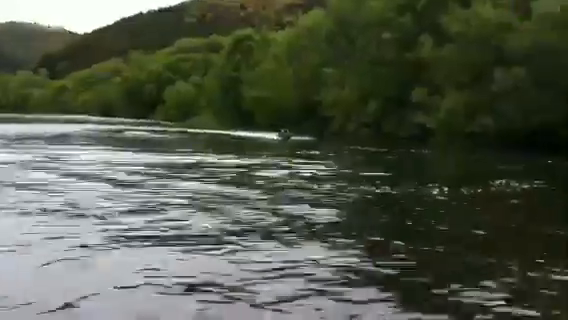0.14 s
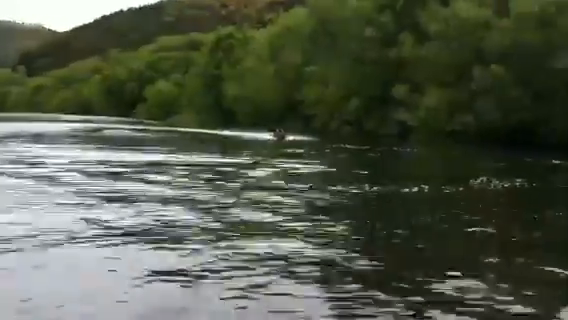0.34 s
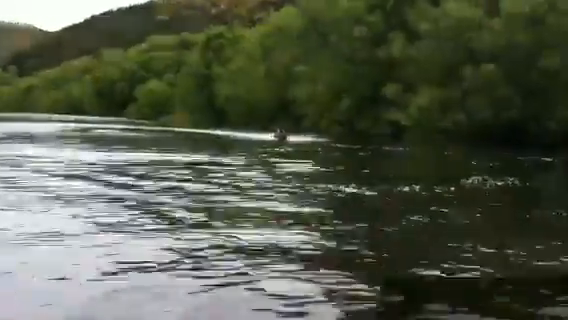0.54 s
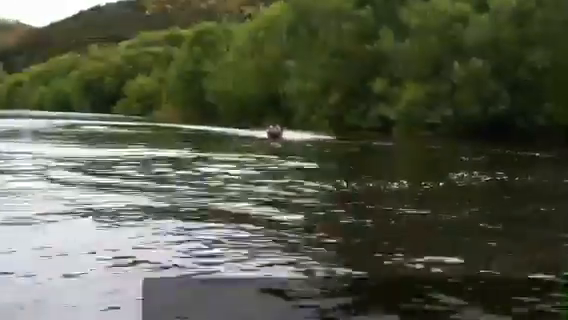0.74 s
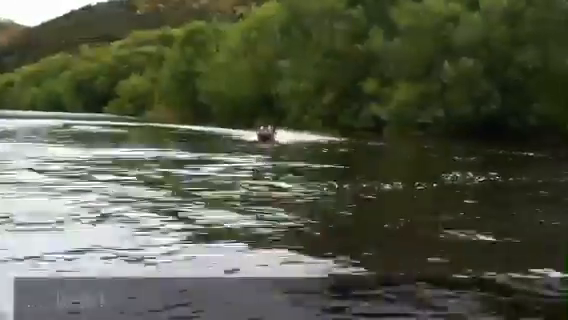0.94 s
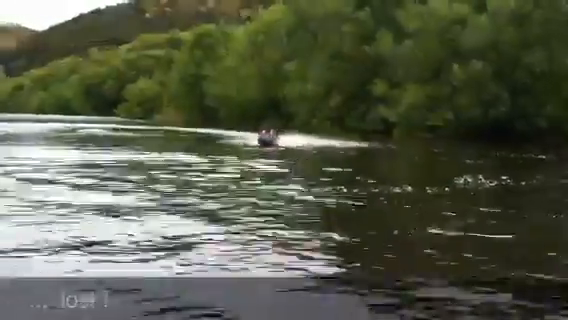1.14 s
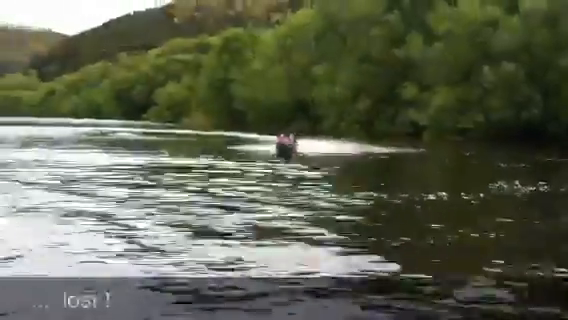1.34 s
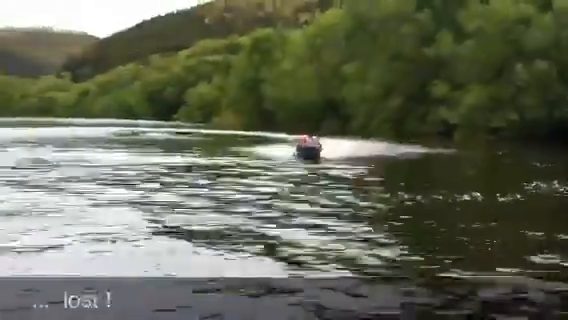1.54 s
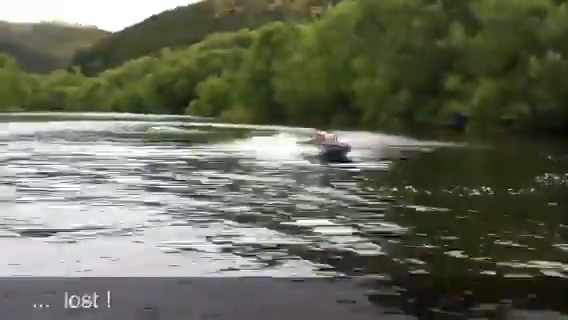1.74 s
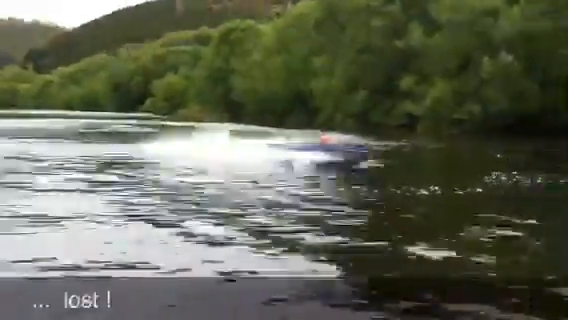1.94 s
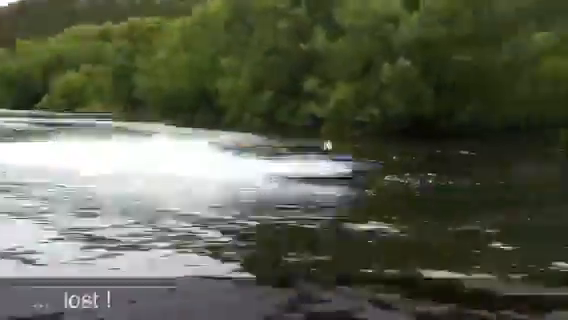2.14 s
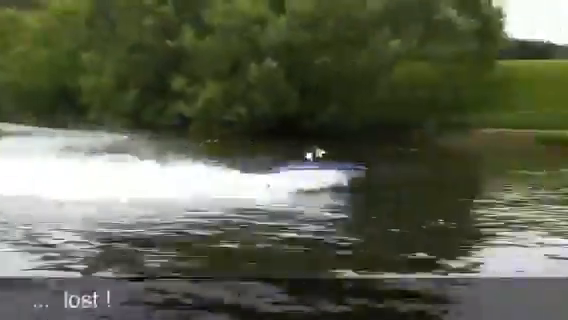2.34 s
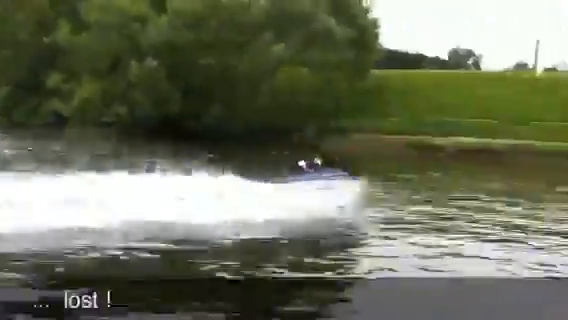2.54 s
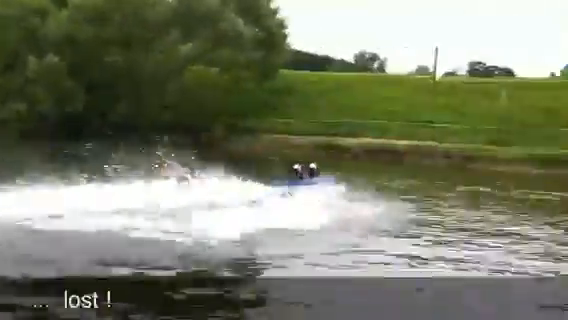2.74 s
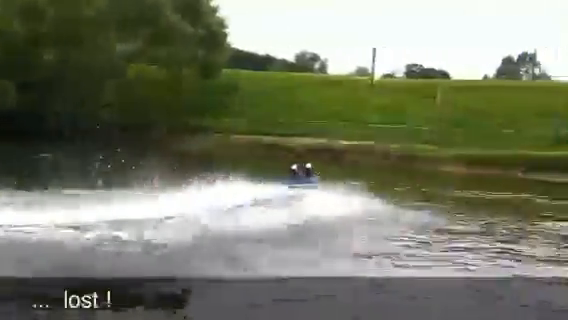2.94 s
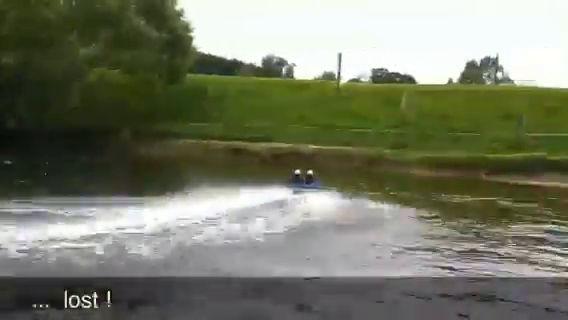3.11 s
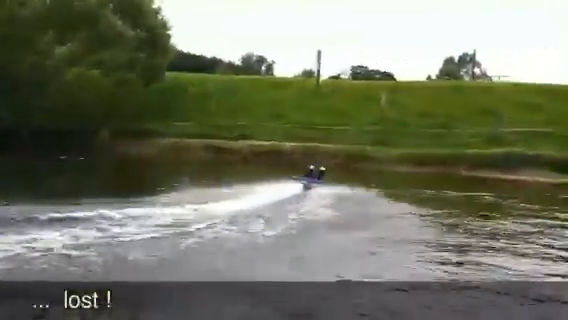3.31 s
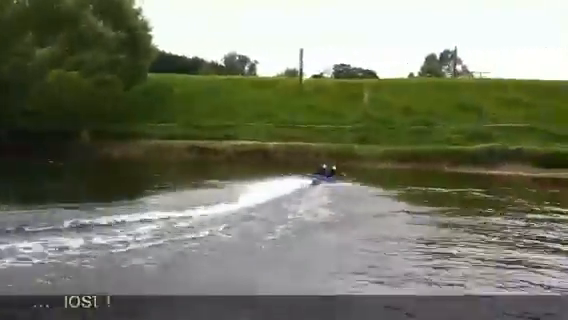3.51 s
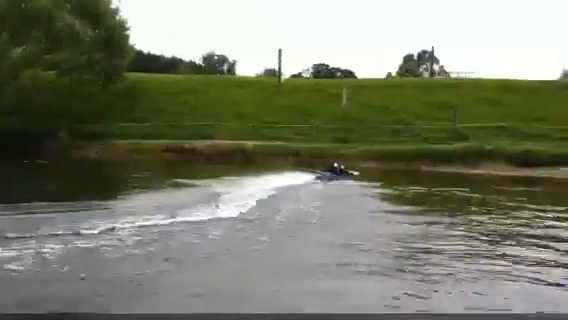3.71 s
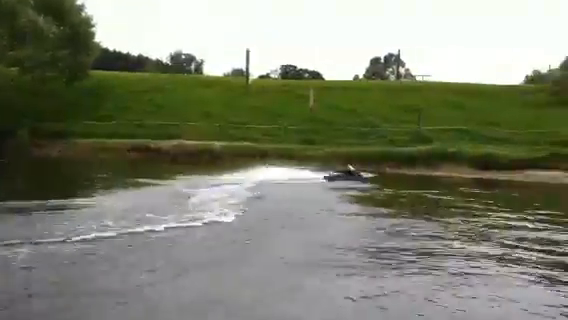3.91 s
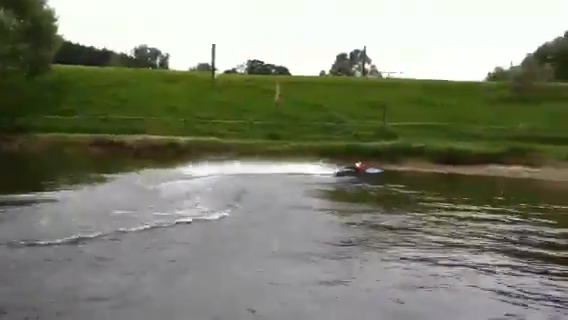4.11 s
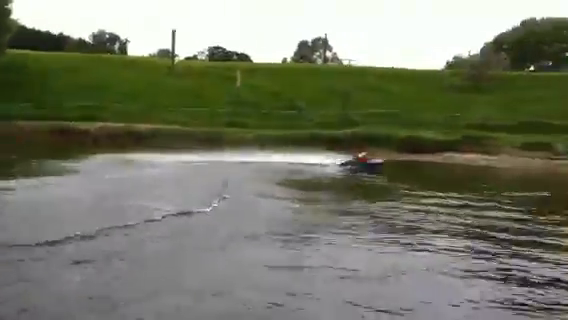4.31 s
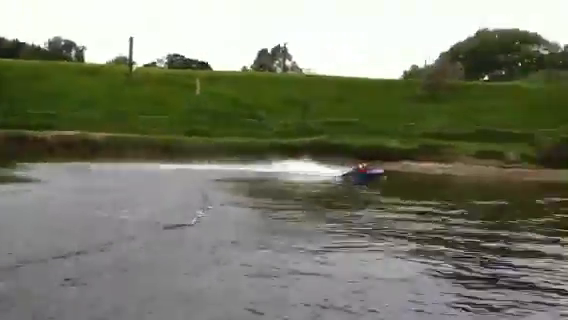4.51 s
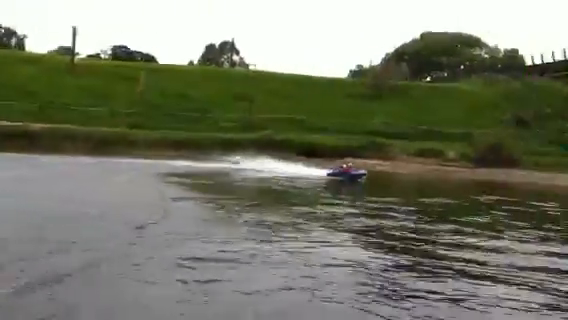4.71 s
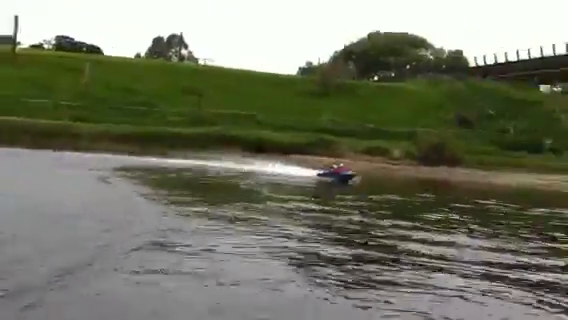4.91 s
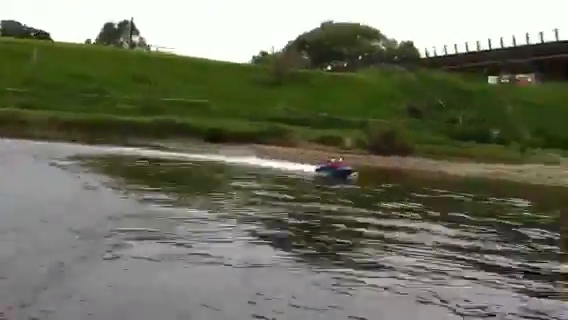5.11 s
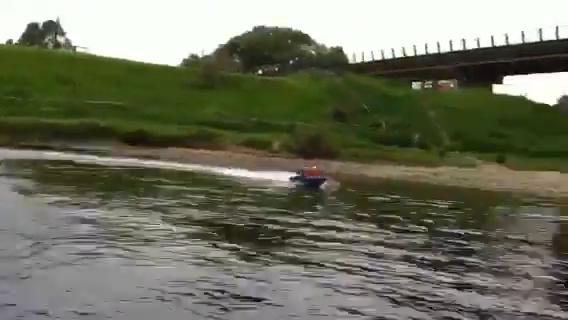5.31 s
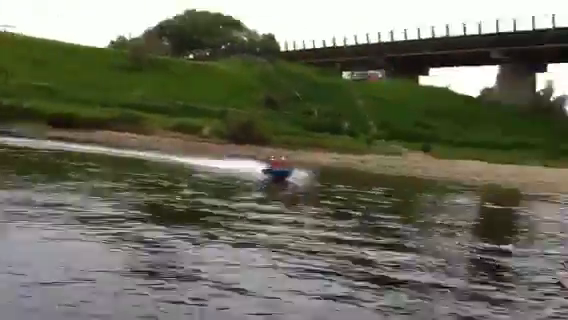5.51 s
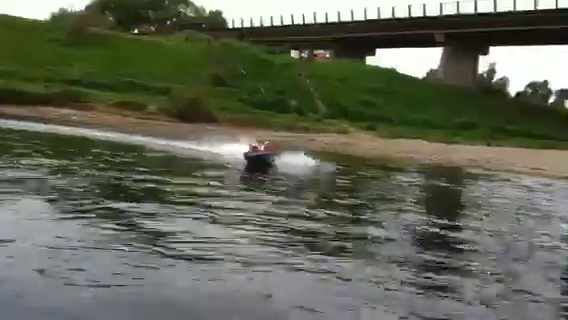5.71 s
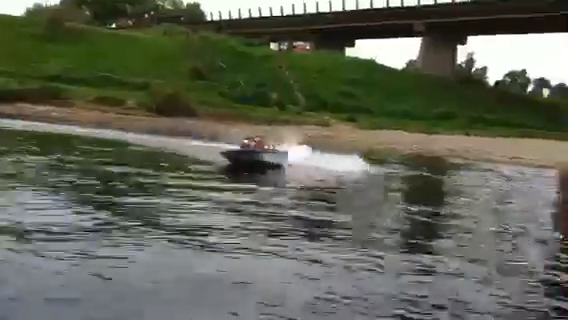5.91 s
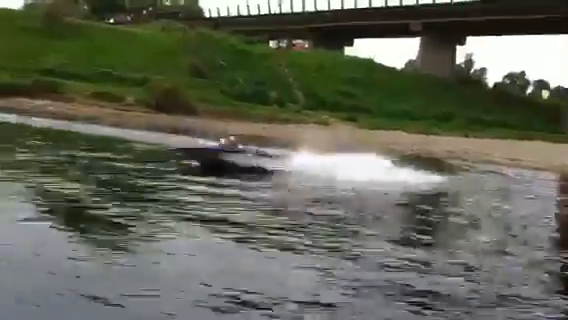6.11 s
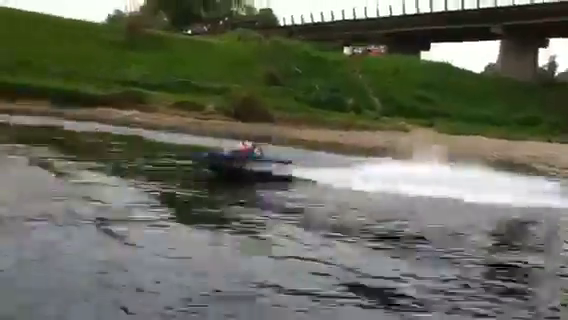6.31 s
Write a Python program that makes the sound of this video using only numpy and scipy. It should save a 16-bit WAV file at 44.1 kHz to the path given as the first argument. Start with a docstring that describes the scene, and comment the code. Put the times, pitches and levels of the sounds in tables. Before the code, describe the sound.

Outdoors on a river between wooded banks, a model jet boat with a small two-stroke engine runs towards the microphone, its buzzing scream growing. It gargles as it turns, sweeps past close with a deeper hum and hissing spray, then rasps harshly as its stern swings round. It continues farther off, smacks the water once, then curves back, nearer and brighter, with light wind touching the microphone.

```python
"""A river between wooded banks: a model jet boat with a two-stroke engine runs up, sweeps past, turns away
and comes round again. Each firing sends a pulse and a puff of rasping gas out of the exhaust: a hum, a bark
and a snarl built from harmonics and gargling noise, whose colour depends on the side the boat shows.
Spray hisses as coloured noise, the hull smacks the water once, scattered delays echo from the banks,
and a little low wind noise touches the microphone."""
import sys
import numpy as np
from scipy import signal
from scipy.fft import rfft, irfft
from scipy.io import wavfile
from scipy.ndimage import uniform_filter1d

SR = 44100
rng = np.random.default_rng(int(sys.argv[2]) if len(sys.argv) > 2 else 0)


def store_pcm(level_fs):
    """Save levels as 16-bit WAV."""
    pcm = np.round(np.clip(level_fs, -1, 1) * 32767).astype(np.int16)
    wavfile.write(sys.argv[1], SR, np.atleast_2d(pcm).T)


N = 280035
TIME = np.arange(N) / SR  # seconds

# side turned to the listener: time_s, aspect (0 bow, 1 beam, 2 stern quarter, 3 stern, 4 far beam, 5 bow quarter)
ASPECT = [(0, 0), (1.75, 0), (2.1, .6), (2.35, 1), (2.78, 1), (3.02, 2), (3.3, 2.2), (3.68, 3), (3.9, 3),
          (4.02, 4), (5.47, 4), (5.65, 5), (6.35, 5)]


def from_db(db):
    """Decibels to gain."""
    return 10 ** (np.asarray(db) / 20)


def rms_one(x):
    """Scale to unit rms."""
    return x / np.sqrt(np.mean(x ** 2) + 1e-20)


def evened(x, size=2200):
    """Hold the short-term rms at one, over a window of size samples."""
    return x / np.sqrt(np.abs(uniform_filter1d(x ** 2, size)) + 1e-12)


def in_time(rows):
    """Each column of a curve, at every sample."""
    seconds, *columns = np.transpose(rows)
    return [np.interp(TIME, seconds, column) for column in columns]


def swells(rows):
    """Each event rises smoothly to its height and falls again."""
    return sum(height * np.exp(-((TIME - middle_s) / half_s) ** 2) for middle_s, half_s, height in rows)


def bursts(rows):
    """Swells whose heights are given in decibels, as a gain."""
    return swells([(middle_s, half_s, from_db(db)) for middle_s, half_s, db in rows])


def drift(rate_hz, size=8192):
    """Slow random wandering of unit rms, weakening above rate_hz."""
    hz = np.fft.rfftfreq(size, N / SR / size)
    spectrum = rfft(rng.standard_normal(size)) / (1 + (hz / rate_hz) ** 2)
    slow = rms_one(irfft(spectrum))
    return np.interp(TIME, np.linspace(0, N / SR, size), slow)


def noise(colour):
    """Noise of a given colour, rms one."""
    hz, db = np.transpose(colour)
    log_hz = np.log(np.fft.rfftfreq(N, 1 / SR) + 1)
    gain = from_db(np.interp(log_hz, np.log(hz), db))
    return rms_one(irfft(rfft(rng.standard_normal(N)) * gain, N))


def butter(x, edges, kind, order=2):
    """Causal Butterworth filter."""
    return signal.sosfilt(signal.butter(order, edges, kind, fs=SR, output="sos"), x)


def wind(lumpy_db=4.0):
    """Lumpy low buffeting: dark noise that swells with each gust of air on the microphone."""
    # colour of the buffeting: frequency_hz, density_db (per Hz, relative)
    wind_colour = [(25, -33), (70, -10), (130, 5), (180, 11.5), (280, 0), (600, -27), (2000, -64)]
    # air on the microphone: middle_s, half_length_s, level_db
    gusts = [(2.149, .12, -48), (2.6, .1, -54), (3.151, 0.14, -51), (5.699, 0.16, -43), (5.956, 0.081, -32),
             (6.161, 0.14, -33.5)]
    return noise(wind_colour) * bursts(gusts) * from_db(lumpy_db * drift(12))


def banks(x, t60=.6, first_s=.03, dull_hz=3500, count=60):
    """Scattered dull echoes from trees and shore, falling 60 dB over t60 seconds."""
    delays = first_s + rng.random(count) * t60
    echoes = np.zeros(N)
    echoes[(delays * SR).astype(int)] = rng.standard_normal(count) * from_db(-60 * delays / t60)
    wet = signal.fftconvolve(x, echoes / np.linalg.norm(echoes))[:N]
    return butter(wet, [400, dull_hz], "band", order=1)


def towards_listener():
    """Levels in dB of bark, snarl, gargles and spray, from side shown, distance, dunks, flares and bobbing."""
    # the boat's course: time_s, distance_m
    course = [(0, 36), (.5, 21.1), (1.25, 18), (1.62, 14.6), (2.4, 8.8), (2.95, 17.6), (3.5, 21.7),
              (3.9, 18.3), (4.85, 21.5), (5.35, 17.5), (6.15, 11.6), (6.35, 13.6)]
    # what each side sends out at the reference distance, one row per aspect from bow to bow quarter:
    # bark_db, snarl_db, bark_gargle_db, snarl_gargle_db (gargles re pulses), spray_db (before the spray's gain)
    sides = [(-15.5, -17.5, -11.5, -1.5, -32), (-11.5, -19, -18.5, -6, -35),
             (-13.5, -14, -16, -10.5, -38.5), (-15.5, -9, -17, -13.5, -38),
             (-14.5, -15.5, -18.5, -4.5, -30.5), (-14.5, -17, -18.5, -2.5, -32.5)]
    # the outlet dips under water: middle_s, half_length_s, depth (0-1)
    dunks = [(1.86, .075, 1.0), (2.22, .06, .35), (5.55, .045, .8)]
    # the snarl flares up briefly: middle_s, half_length_s, gain_db
    flares = [(1.32, 0.021, 3.5), (1.91, 0.033, 3.5), (2.2, .12, 4), (2.66, 0.11, 4), (3.26, 0.052, 4.5),
              (3.85, 0.11, 1.5), (5.9, 0.12, 4)]
    reference_m = 10
    dunk_bark_db, dunk_snarl_db, dunk_gargle_db = -9.5, -3.5, 12  # change at full depth
    bob_hz, bob_db = 5.5, 1.06  # the hull rocks on the ripples and swings the beam of the snarl

    aspect, = in_time(ASPECT)
    metres, = in_time(course)
    levels = [np.interp(aspect, np.arange(len(sides)), column) for column in np.transpose(sides)]
    bark, snarl, bark_gargle, snarl_gargle, wake = levels
    spreading = 20 * np.log10(reference_m / metres)
    depth = swells(dunks)
    return {"bark": bark + spreading + dunk_bark_db * depth,
            "snarl": snarl + spreading + dunk_snarl_db * depth + swells(flares) + bob_db * drift(bob_hz),
            "bark gargle": bark_gargle + dunk_gargle_db * depth,
            "snarl gargle": snarl_gargle,
            "spray": wake + spreading}


def spray(heard, level_db=6.5, patchy_db=1.74):
    """Droplets fall back on the river, steadily from the wake and in sheets when the hull digs in."""
    # colour of the hiss: frequency_hz, density_db (per Hz, relative)
    spray_colour = [(30, -53), (90, -15), (170, -7), (500, -1.5), (720, -4), (1300, 1.5), (2700, -2),
                    (3800, 2.5), (5000, 2.5), (6400, 0.5), (7300, -5.5), (10000, -4), (14000, -3),
                    (16000, -28)]
    # the hull throws a sheet of spray: middle_s, half_length_s, level_db (before the gain below)
    sheets = [(2.14, 0.051, -34), (2.501, .07, -33), (2.88, 0.25, -36), (4.38, 0.051, -35),
              (4.62, 0.079, -35), (5.77, 0.044, -30.5), (5.87, 0.055, -29)]
    flow = np.hypot(from_db(heard["spray"]), bursts(sheets))
    return noise(spray_colour) * flow * from_db(level_db + patchy_db * drift(15))


def slaps(decay_s=0.0073, dull_hz=1800):
    """The hull drops on its own wake: a short, dull smack of noise that dies away exponentially."""
    # smacks: start_s, level_db (before halving)
    smacks = [(3.894, -14.5)]
    blows = sum(from_db(db) * (TIME > start_s) * np.exp(-np.abs(TIME - start_s) / decay_s)
                for start_s, db in smacks)
    return blows * rms_one(butter(rng.standard_normal(N), [150, dull_hz], "band", order=1)) / 2


def crank(flutter=0.00204, jitter_turns=0.00094):
    """Turns of the crankshaft; the speed flutters and each firing comes a little early or late."""
    # engine speed as heard: time_s, firing_rate_hz
    engine_speed = [(0.0, 218.8), (0.28, 219.1), (0.32, 221.0), (0.53, 220.8), (0.65, 215.7), (0.76, 216.0),
                    (0.8, 218.2), (0.96, 220.3), (1.09, 216.9), (1.31, 220.3), (1.5, 214.8), (1.64, 216.4),
                    (1.8, 215.1), (2.09, 209.6), (2.23, 204.9), (2.32, 207.3), (2.39, 204.4), (2.47, 208.0),
                    (2.55, 206.6), (2.72, 207.7), (2.95, 204.8), (3.0, 206.7), (3.2, 205.7), (3.25, 203.2),
                    (3.34, 203.5), (3.41, 207.6), (3.5, 208.4), (3.62, 214.2), (3.71, 211.1), (4.1, 211.5),
                    (4.17, 215.1), (4.23, 213.5), (4.42, 214.6), (4.47, 218.6), (4.56, 216.5),
                    (4.78, 216.0), (5.13, 220.4), (5.18, 218.9), (5.31, 220.2), (5.89, 219.7),
                    (6.14, 222.4), (6.35, 219.6)]
    speed, = in_time(engine_speed)
    return np.cumsum(speed * (1 + flutter * drift(25.4))) / SR + jitter_turns * drift(99)


def puff(turns, length, steady):
    """Gas flow that jumps as the port opens and dies away within the turn (length in turns)."""
    return rms_one(steady + np.exp(-(turns % 1) / length))


def rasp(turns, heard, crack_db=-9.0, uneven_db=-1.0, level_db=-0.5):
    """Pulse fronts and the gas jet behind them ring the pipe outlet; less gargle lets the cracks through harder."""
    # level of the treble rasp: time_s, level_db (before the trim level_db)
    rasp_levels = [(0.0, -37.5), (0.97, -31), (1.25, -23), (1.91, -37.5), (2.1, -27.5), (2.69, -22.5),
                   (2.83, -16.5), (3.09, -21.5), (4.03, -20), (4.07, -23.5), (4.99, -33), (5.64, -35),
                   (5.89, -21.5), (5.98, -28), (6.24, -21), (6.35, -24.5)]
    # brightness of the rasp: time_s, tilt_db_per_octave
    rasp_tilt = [(0, -5), (1.4, -10), (2.1, -1), (3.3, -0.5), (3.9, 11), (4.4, -6.5), (5.2, 4.5), (5.8, -5),
                 (6.35, 13)]
    # rings of the pipe outlet: pitch_hz, width_hz, level_db (relative, before the tilt)
    outlet = [(4700, 520, -10), (6068, 570, 0.5), (9500, 1400, -1), (10880, 690, -7), (13600, 1600, -2)]

    rasp_db, = in_time(rasp_levels)
    tilt_db, = in_time(rasp_tilt)
    gargle_db = heard["snarl gargle"]
    fronts = np.exp(-(np.sin(np.pi * turns) / .034) ** 2)
    cracks = rms_one(np.diff(fronts, prepend=0))
    flow = puff(turns, length=.4, steady=.5 * from_db(.7 * gargle_db))
    # the narrow jet hisses high, so the cracks stand clear below it
    jet = rms_one(butter(rng.standard_normal(N), 7000, "high")) * flow
    drive = from_db(crack_db - 0.2 * gargle_db) * cracks + jet
    drive = drive * from_db(uneven_db * drift(91))
    rings = 0
    for hz, width, db in outlet:
        ring = butter(drive, [hz - width / 2, hz + width / 2], "band")
        tilted_db = db + tilt_db * np.log2(hz / outlet[1][0])  # tilts about the second ring
        rings = rings + evened(ring) * from_db(tilted_db + 1.83 * drift(9.8))
    return evened(rings) * from_db(rasp_db + level_db)


def pulse_shape(orders, fall_db=2.5, size=128):
    """Log level and phase of each harmonic of a sharp-fronted pulse, followed by the ringing of the pipe."""
    k, db = np.transpose(orders)
    multiples = np.arange(size // 2 + 1)
    level_db = np.interp(multiples, k, db - db.max())
    level_db = level_db - fall_db * np.clip(multiples - k[-1], 0, 20)  # above the last listed harmonic
    cepstrum = irfft(np.log(from_db(level_db)))
    return 2 * rfft(cepstrum[:size // 2], size) - cepstrum[0]  # minimum phase


def firings(turns, heard, smear=.016, count=30):
    """A pulse per turn, reshaped as the boat swings; wave reflections make each harmonic waver."""
    # exhaust pulse from each side: harmonic (multiple of the firing rate), level_db (relative)
    bow = [(2, -11), (3, -22.5), (4, -9), (5, -10), (6, 3.5), (7, -14), (8, -2.5), (9, -15), (10, -7),
           (11, -16.5), (12, -2.5), (13, -12.5), (14, -7.5), (15, -33), (16, -15), (17, -23.5)]
    beam = [(2, -19), (3, -6), (4, -9.5), (5, 7), (6, -6.5), (7, -7), (8, -12), (9, -25.5), (10, -12.5),
            (11, -11), (12, -15), (13, -10), (14, -26), (15, -21), (16, -29), (17, -23)]
    stern_quarter = [(2, -3), (3, -1.5), (4, 3.5), (5, 10), (6, -4), (7, 9.5), (8, 6), (9, -1), (10, 3.5),
                     (11, 10.5), (12, -3), (13, 1), (14, -38), (17, -17)]
    stern = [(2, -13), (3, -11), (4, 5), (5, -4), (6, -7.5), (7, 0), (8, 4.5), (9, -3.5), (10, 11),
             (11, 1.5), (12, 11), (13, -8), (15, -12), (17, -11.5), (19, -41)]
    far_beam = [(2, -4.5), (3, -5), (4, 8), (5, 3), (6, 9), (7, 0.5), (8, -3.5), (9, 2), (10, 2), (11, -2),
                (12, 9), (13, -5.5), (14, 0.5), (15, -6), (16, -6.5), (17, -3), (19, -26)]
    bow_quarter = [(2, -2.5), (3, -6.5), (4, -5), (5, -0.5), (6, 9.5), (7, 3.5), (8, -1), (9, 1),
                   (10, -0.5), (11, 0.5), (12, 6), (13, -8.5), (14, -8), (15, -20), (16, -9), (17, -6.5),
                   (18, -29)]

    aspect, = in_time(ASPECT)
    shapes = np.array([pulse_shape(side) for side in (bow, beam, stern_quarter, stern, far_beam, bow_quarter)])
    wash = from_db(0.32 * heard["snarl gargle"])  # more water in the way, more wavering
    pulses = 0
    for k in range(2, count):
        shape = np.interp(aspect, np.arange(len(shapes)), shapes[:, k])
        waves = .38 * (drift(6) + 1j * drift(6)) + .27 * drift(22)
        phase = 2 * np.pi * k * turns - smear * k ** 2  # the pipe lets the highs out slightly later
        pulses = pulses + np.real((1 + wash * waves) * np.exp(shape + 1j * phase))
    return pulses


def split(x, edge_hz=1600):
    """The bark below and the snarl above, each held at rms one."""
    low = signal.sosfiltfilt(signal.butter(6, edge_hz, fs=SR, output="sos"), x)
    return evened(low), evened(x - low)


def exhaust(turns, heard, uneven_db=-0.56):
    """Hum, bark and snarl of the pipe, roughened by water at the outlet."""
    # level of the hum at the firing rate: time_s, level_db (before fades and drift)
    hum_levels = [(0, -34), (1.0, -31.5), (1.62, -28.5), (1.8, -20.5), (2.15, -15), (2.95, -21.5),
                  (3.4, -32.5), (4.8, -34), (5.35, -26.5), (6.35, -27)]
    # the hum fades briefly: middle_s, half_length_s, gain_db
    hum_fades = [(2.34, 0.042, -12), (4.19, .03, -5), (4.47, .025, -11), (5.67, 0.03, -4),
                 (5.98, 0.032, -10), (6.2, 0.027, -10)]
    # colour of the gargle: frequency_hz, density_db (per Hz, relative)
    gargle_colour = [(130, -31), (200, -3), (330, -5), (520, -2), (720, -7.5), (1000, 1), (1350, 3),
                     (1800, -1), (2400, 4.5), (3100, -5), (4000, -21.5), (7000, -35)]

    hum_db = in_time(hum_levels)[0] + swells(hum_fades)
    pulses = firings(turns, heard) * from_db(uneven_db * drift(60))
    flow = puff(turns, length=.6, steady=.45)
    gargle = noise(gargle_colour) * flow * from_db(1.9 * drift(25))
    gargle = butter(gargle, 185, "high", order=4)
    sound = np.sqrt(2) * np.sin(2 * np.pi * turns) * from_db(hum_db + 2.13 * drift(11))
    # the low bark spreads all round, the snarl is beamed and broken up by the spray
    for tone, rough, part in zip(split(pulses), split(gargle), ("bark", "snarl")):
        share = from_db(heard[part + " gargle"])
        blend = (tone + share * rough) / np.hypot(1, share)
        sound = sound + blend * from_db(heard[part])
    return sound


def scene():
    """Wind, echoes and boat, as one channel."""
    turns, heard = crank(), towards_listener()
    boat = spray(heard) + slaps() + rasp(turns, heard) + exhaust(turns, heard)
    echoes = from_db(-16) * banks(boat)
    return (wind() + echoes + boat)[None]


def record(dry):
    """The loudest peaks are rounded off and the top is cut."""
    cutoff_hz = 15500
    rounded = dry / (1 + (dry / .69) ** 10) ** (1 / 10)
    return signal.sosfilt(signal.ellip(10, .1, 90, cutoff_hz, fs=SR, output="sos"), rounded)


dry = scene()
out = record(dry)
store_pcm(out)
```